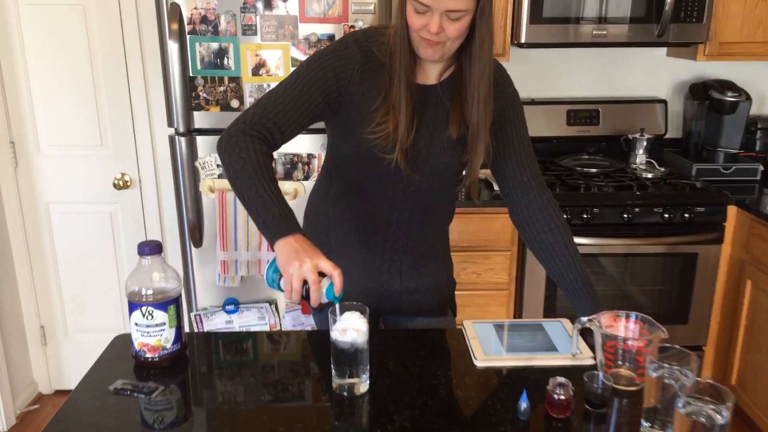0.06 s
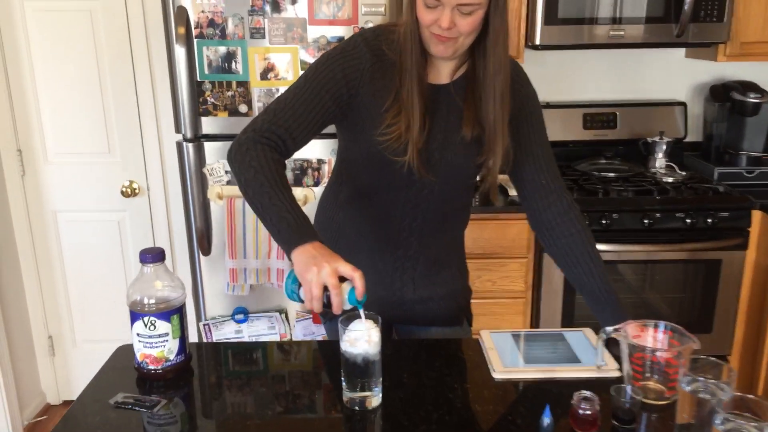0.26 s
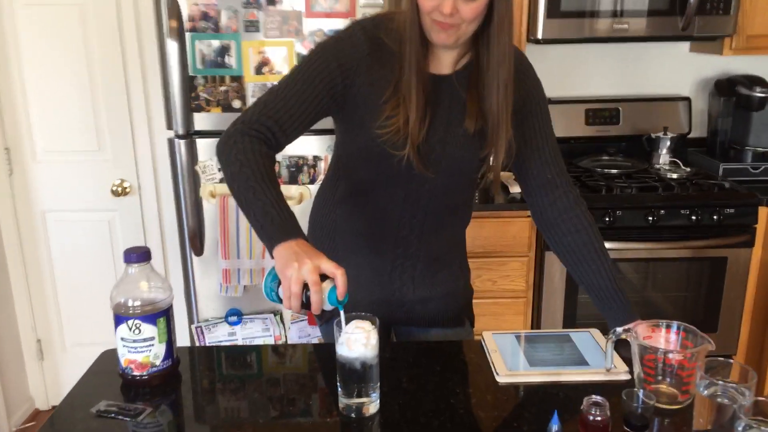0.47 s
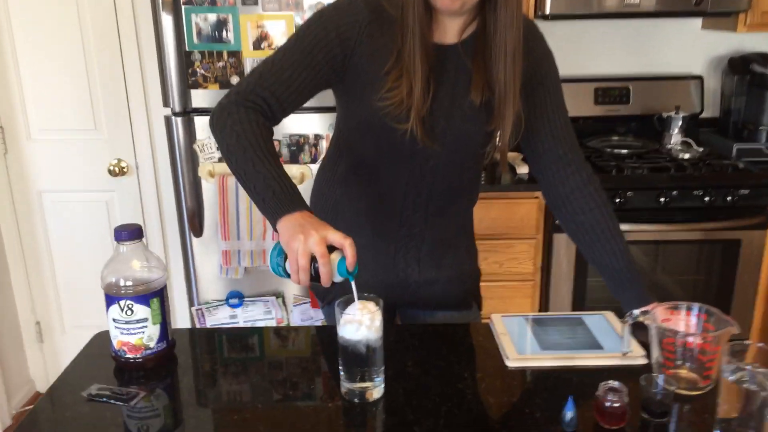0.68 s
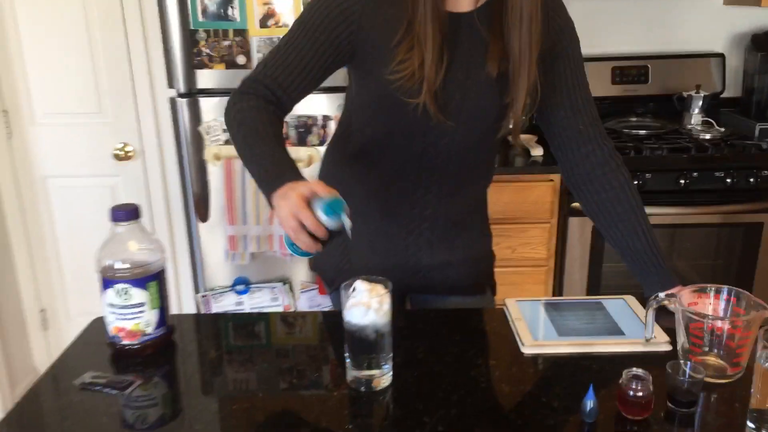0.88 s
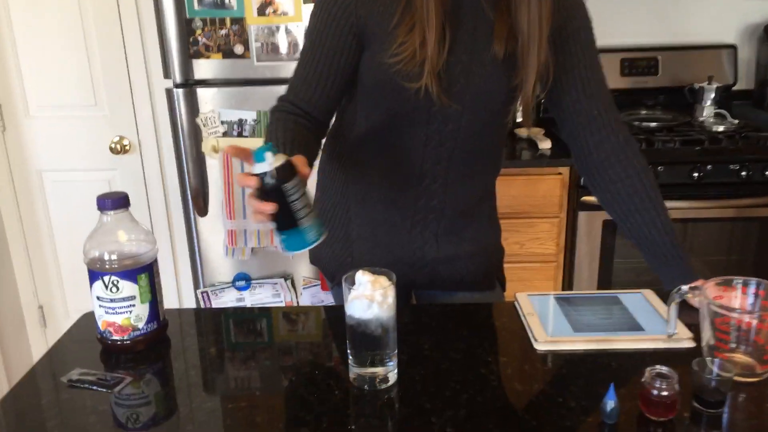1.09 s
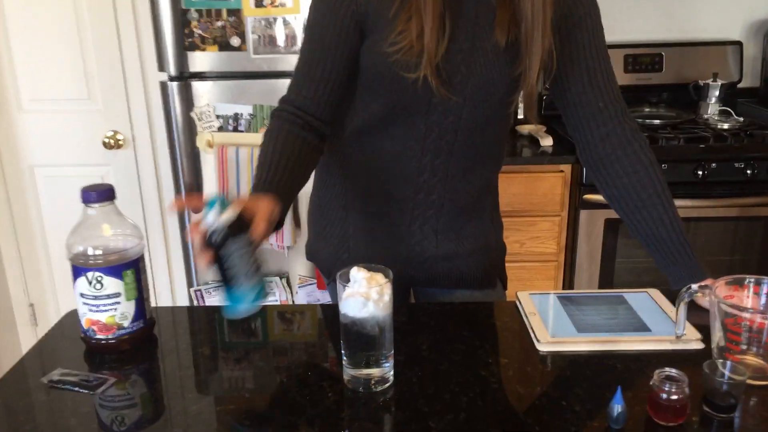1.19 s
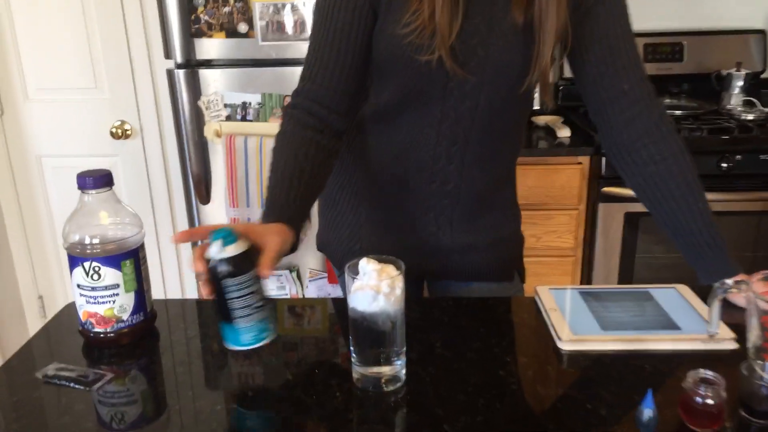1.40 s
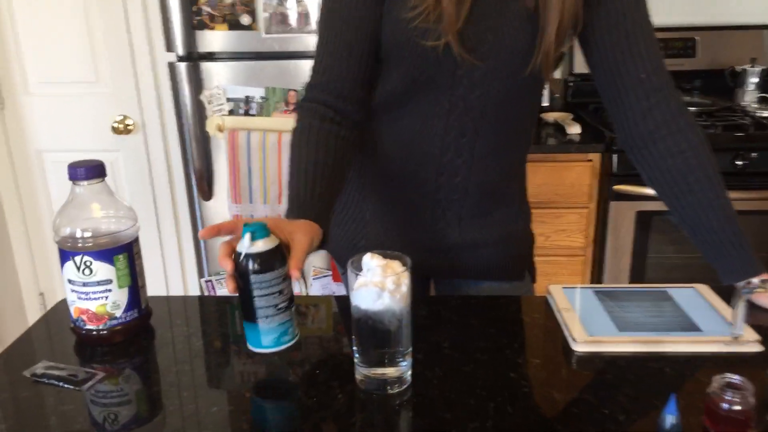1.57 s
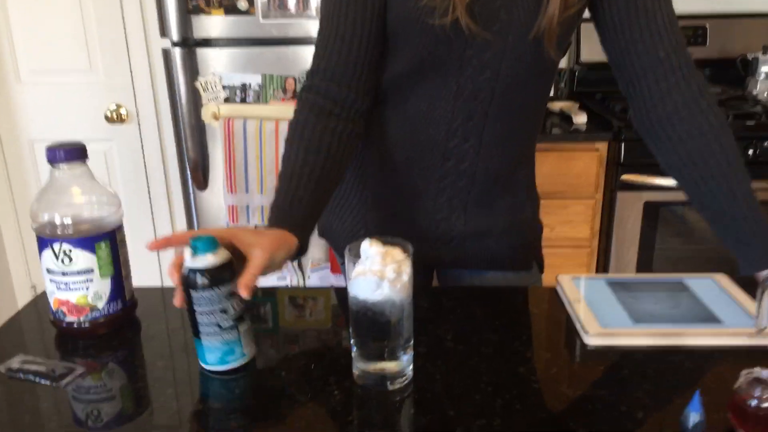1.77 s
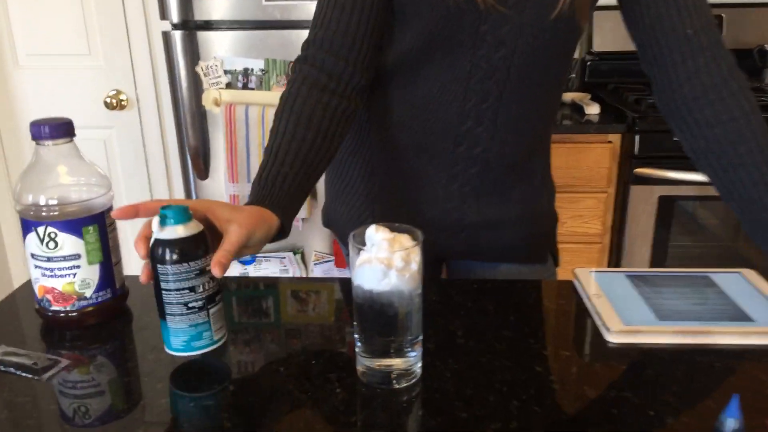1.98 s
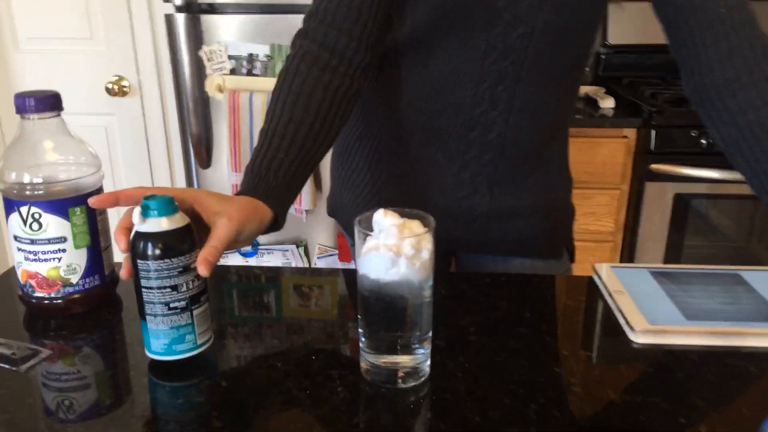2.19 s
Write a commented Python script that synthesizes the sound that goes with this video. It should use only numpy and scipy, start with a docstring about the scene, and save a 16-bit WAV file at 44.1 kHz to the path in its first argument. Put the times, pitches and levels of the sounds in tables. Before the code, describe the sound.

A spray can sputters foam into a glass and is set down with a ringing clack.

```python
"""A small kitchen: aerosol foam hisses and sputters into a glass as tiny bubbles burst, then stops.
A brighter spit of gas escapes with it early on.
The can is set down on a stone counter; its rim clacks and its shell rings through the room.
The hand-held camera adds low rumble, soft bumps and a few dry clicks of its case.
Faint room hiss lies underneath, with a high fizz in the second half."""
import sys
import numpy as np
from scipy import signal
from scipy.fft import rfft, irfft, next_fast_len
from scipy.io import wavfile
from scipy.ndimage import uniform_filter1d, map_coordinates

SR = 44100
rng = np.random.default_rng(int(sys.argv[2]) if len(sys.argv) > 2 else 0)


def file_out(sig):
    """Save sig as 16-bit WAV at sys.argv[1]."""
    # one column per channel
    cols = np.atleast_2d(sig).T
    # limit, then scale
    lim = np.clip(cols, -1, 1)
    pcm = np.round(lim * 32767).astype(np.int16)
    wavfile.write(sys.argv[1], SR, pcm)


N = 99225
TOP_HZ = 15850
# camera case modes: pitch_hz, level_db, t60_s
CASE_MODES = [(337, -17.5, 0.03), (558, 2, 0.024), (914, -1.5, 0.0076), (2180, -16, 0.0097)]


def amp(db):
    return 10 ** (np.asarray(db) / 20)


def unit(x):
    """Scale to rms 1."""
    return x / np.sqrt(np.mean(x ** 2) + 1e-20)


def along(points, hz):
    """Interpolate (freq_hz, value) rows on a log axis."""
    freq_hz, values = np.transpose(points)
    return np.interp(np.log(hz + 1), np.log(freq_hz + 1), values)


def curve(rows):
    """One value per sample from (time_s, value) rows."""
    return np.interp(np.arange(N) / SR, *np.transpose(rows))


def wobble(knots_per_s):
    """Smooth random curve."""
    return map_coordinates(rng.standard_normal(N // 20), [np.arange(N) * knots_per_s / SR])


def fade(t, t60_s):
    return np.exp(-np.log(1000) * t / t60_s)


def attack(t, rise_s):
    return 1 - np.exp(-t / rise_s)


def colour(x, spectrum):
    """Minimum-phase filter of unit power gain, shaped by (freq_hz, gain_db) rows."""
    size = 8192
    gain = amp(along(spectrum, np.fft.rfftfreq(size, 1 / SR)))
    cepstrum = irfft(np.log(unit(gain)))
    cepstrum[1:size // 2] *= 2
    cepstrum[size // 2 + 1:] = 0
    return signal.fftconvolve(x, irfft(np.exp(rfft(cepstrum))))[:len(x)]


def noise(spectrum):
    """Coloured noise of rms 1."""
    return unit(colour(rng.standard_normal(N + SR), spectrum)[SR:])


def add(track, start_s, sound):
    part = track[round(start_s * SR):][:len(sound)]
    part += sound[:len(part)]


def ring(modes, t, scatter_db):
    """Damped modes, each struck a little differently."""
    return sum(amp(db + scatter_db * rng.standard_normal()) * fade(t, t60_s) * np.sin(2 * np.pi * hz * t)
               for hz, db, t60_s in modes)


def room_hiss():
    """Steady hiss of the quiet room."""
    # hiss spectrum: freq_hz, gain_db
    spectrum = [(100, 21), (550, 20), (900, 6), (2000, 1), (4500, -8), (6400, -3), (7700, -10), (9200, -7),
                (9900, 3), (10500, -19), (13000, -3), (15700, -6)]
    return amp(-59) * noise(spectrum)


def handling_rumble():
    """Low handling rumble, with a low thump as the can lands at 1.9 s."""
    # rumble envelope: time_s, level_db
    envelope = [(0.0, -49.5), (0.07, -45), (0.26, -38), (0.35, -58.5), (0.38, -37), (0.48, -54),
                (0.53, -40), (0.6, -45), (0.63, -46), (0.71, -56), (0.75, -46), (0.82, -67), (0.85, -42),
                (0.94, -51.5), (0.97, -41), (1.23, -53), (1.28, -40.5), (1.3, -53), (1.5, -41),
                (1.53, -56.5), (1.55, -45), (1.81, -46), (1.87, -61), (1.9, -34), (1.95, -49.5),
                (2.0, -41.5), (2.04, -48), (2.25, -45)]
    # rumble spectrum: freq_hz, gain_db
    spectrum = [(18, -59), (35, -18.5), (55, -1.5), (80, 3.5), (130, -8.5), (200, -7.5), (300, -15.5),
                (420, -23.5), (600, -25), (900, -41), (2000, -51.5)]
    return amp(curve(envelope) - 0.5) * noise(spectrum)


def hand_bumps():
    """The hand bumps the camera: a rub and a knock of the case over a low thud."""
    # bumps: start_s, knock_db, thud_db
    bumps = [(.065, -59, -26.5), (0.106, -53, -24), (.38, -54, -26), (0.5, -39.5, -26), (.527, -39, -29),
             (.572, -26, -49), (0.851, -37.5, -37), (.967, -50, -27), (1.037, -42, -29.5),
             (1.065, -36, -46), (1.101, -39.5, -31.5), (1.144, -40.5, -30), (1.268, -39, -31),
             (1.352, -47, -33), (1.374, -40.5, -31.5), (1.485, -48.5, -35), (1.611, -49, -39),
             (1.721, -44.5, -35), (1.766, -42.5, -40), (1.79, -52, -30), (1.84, -47, -36),
             (1.995, -48, -33), (2.075, -47, -32), (2.171, -41, -27), (2.22, -64, -29.5)]
    # rub spectrum: freq_hz, gain_db
    rub_spectrum = [(30, -23), (90, 16), (250, -6), (420, -13), (590, 9.5), (760, -13), (1200, -30),
                    (3000, -43)]
    # modes of the camera in the hand: pitch_hz, level_db, t60_s
    thud_modes = [(75.8, -4, .09), (134.4, 1.5, 0.046), (213.4, 2, 0.017)]
    out, t = np.zeros(N), np.arange(SR // 10) / SR
    for start_s, knock_db, thud_db in bumps:
        rub = unit(colour(rng.standard_normal(len(t)), rub_spectrum)) * fade(t, t60_s=0.031)
        knock = amp(4) * rub + ring(CASE_MODES, t, scatter_db=-0.7)
        thud = ring(thud_modes, t, scatter_db=2.0) / 2
        add(out, start_s, (amp(knock_db) * knock + amp(thud_db) * thud) * attack(t, rise_s=0.0011))
    return out


def sputter(spectrum, flutter_db):
    """Tiny bubbles burst on a turbulent hiss, fluttering as foam and gas alternate."""
    pops_per_s, spread_db, pop_share = 1500, 4.5, 0.65
    pops = (rng.random(N) < pops_per_s / SR) * rng.choice([-1, 1], N)
    pops = pops * amp(spread_db * rng.standard_normal(N))
    source = np.sqrt(pop_share) * unit(pops) + np.sqrt(1 - pop_share) * rng.standard_normal(N)
    flutter = amp(flutter_db * (wobble(44.72) + wobble(220)))
    return unit(colour(source * flutter, spectrum))


def patchy(x, depth_db=2.6):
    """Brief resonances come and go as foam shifts in the nozzle and the glass."""
    bins = signal.stft(x, nperseg=512)[2]
    patches = uniform_filter1d(rng.standard_normal(bins.shape), size=5, axis=0)
    patches = uniform_filter1d(patches, size=7, axis=1)
    return unit(signal.istft(bins * amp(depth_db * unit(patches)), nperseg=512)[1][:N])


def bubbles():
    """Larger bubbles burst at random, each with a brief ping."""
    bursts_per_s, spread_db = 260, 4
    centre_hz, spread_octaves, t60_cycles = 4580, 0.546, 40
    out, t = np.zeros(N), np.arange(SR // 20) / SR
    for pitch, size in rng.standard_normal((int(bursts_per_s * N / SR), 2)):
        hz = min(centre_hz * 2 ** (spread_octaves * pitch), TOP_HZ)
        ping = np.sin(2 * np.pi * hz * t) * fade(t, t60_cycles / hz)
        add(out, rng.uniform(0, N / SR), amp(spread_db * min(size, 2)) * ping)
    return unit(out)


def foam():
    """Foam leaves the nozzle, sputtering and bubbling."""
    # foam flow: time_s, level_db
    flow = [(0, -42), (.2, -42), (.209, -36.3), (.35, -35.3), (.44, -37), (.51, -39), (.58, -37.5),
            (.76, -37.5), (.865, -39.5), (.9, -52), (.94, -80)]
    # foam spectrum: freq_hz, gain_db
    spectrum = [(290, -59), (500, -14), (657, -6), (716, -9), (815, -9.5), (941, -11.5), (1060, -12.5),
                (1220, -3), (1310, -5), (1450, -2), (1800, -6), (2010, -1.5), (2570, -19.5), (3060, -11.5),
                (3530, -10), (3960, -1), (4310, -8.5), (6000, -10.5), (6830, -22.5), (8980, -13),
                (10500, -29.5), (14000, -30), (15500, -32)]
    froth = patchy(sputter(spectrum, flutter_db=1.78))
    return amp(curve(flow)) * unit(froth + amp(-8) * bubbles())


def gas_jet():
    """Gas escapes with the foam in a brighter jet, strongest at first."""
    # gas flow: time_s, level_db
    flow = [(0, -58), (.2, -58), (.212, -40), (.28, -39), (.335, -42), (.37, -54), (.56, -58), (.68, -52),
            (.87, -55), (.92, -85)]
    # jet spectrum: freq_hz, gain_db
    spectrum = [(800, -56), (1400, -16), (2900, 4.5), (4500, -7.5), (7000, -41), (9500, -2.5), (10800, -6),
                (12200, 4), (13300, -1), (14300, 4), (15700, -34)]
    return amp(curve(flow)) * patchy(sputter(spectrum, flutter_db=5.0))


def case_clicks():
    """Dry case clicks, each made of two tight impulses, then a short ring."""
    # clicks: start_s, click_db, ring_db
    clicks = [(0.5773, -11, -38), (.6098, -0.5, -24.5), (0.6235, 1, -8.5), (1.4774, -3, -61)]
    # click spectrum: freq_hz, gain_db
    spectrum = [(150, -17), (700, 6), (1600, 2.5), (2700, 1.5), (5000, -8), (8000, -9), (11000, -9),
                (14000, -10), (16000, -5)]
    second_impulse_lag_s, ring_lag_s = 0.0003, 0.0007
    grit_db, second_impulse_db = -16, -11.5
    out, t = np.zeros(N), np.arange(SR // 10) / SR
    for start_s, click_db, ring_db in clicks:
        snap = (t == 0) + amp(grit_db) * rng.standard_normal(len(t)) * fade(t, t60_s=0.002)
        click = amp(click_db) * colour(snap, spectrum) / 2
        add(out, start_s, click)
        add(out, start_s + second_impulse_lag_s, -amp(second_impulse_db) * click)
        add(out, start_s + ring_lag_s, amp(ring_db) * ring(CASE_MODES, t, scatter_db=4.5))
    return out


def fizz():
    """A faint, high crackle flickers, swelling after the spray stops."""
    # fizz envelope: time_s, level_db
    envelope = [(0, -78), (1.03, -76), (1.09, -68), (1.17, -71), (1.3, -64.5), (1.72, -65.5), (1.9, -68.5),
                (2.25, -86)]
    # fizz spectrum: freq_hz, gain_db
    spectrum = [(1000, -17), (8000, -16), (11000, -5), (13000, 0.5), (14200, -8), (15700, -14)]
    return amp(curve(envelope)) * patchy(sputter(spectrum, flutter_db=3.5))


def can_on_counter():
    """The can lands and rocks; each rim contact clacks and rings the metal shell."""
    # rim contacts: start_s, level_db
    contacts = [(1.8958, -14), (1.898, -23), (1.921, -26), (1.9345, -27)]
    # clack spectrum: freq_hz, gain_db
    spectrum = [(60, -45), (200, -49), (430, -13.5), (700, -1.5), (1000, -3), (1350, 6.5), (1550, -8),
                (2050, 4), (2600, -10.5), (3400, -14), (4500, -23.5), (6300, -35.5), (7800, -31),
                (11000, -39.5), (16000, -58)]
    # shell modes: pitch_hz, level_db, t60_s
    shell_modes = [(659, -3, 0.14), (721, -7.5, 0.17), (845, -19, 0.097), (1095, -7, 0.23),
                   (1198, -14.5, 0.23), (1332, -15, 0.1), (1776, -8, 0.094), (1875, -1.5, 0.067),
                   (1910, -7.5, 0.17), (2047, -26, 0.18), (2164, -25, 0.36), (2870, -21, .18),
                   (3360, -30, 0.25), (4290, -29, 0.17)]
    out, t = np.zeros(N), np.arange(SR // 2) / SR
    for start_s, level_db in contacts:
        clack = amp(1) * colour(rng.standard_normal(len(t)) * fade(t, t60_s=0.035), spectrum)
        shell = amp(-3.5) * ring(shell_modes, t, scatter_db=0.5)
        add(out, start_s, amp(level_db) * (clack + shell) * attack(t, rise_s=0.00052))
    return out


def kitchen(x, wet_db):
    """Direct sound plus the room's tail, longest in the midrange."""
    # room decay: freq_hz, t60_s
    decay = [(200, 0.13), (1000, 0.49), (2200, 0.44), (4000, 0.39), (8000, 0.21), (14000, 0.39)]
    hz, t, bins = signal.stft(rng.standard_normal(SR), SR, nperseg=256)
    tail = signal.istft(bins * fade(t, along(decay, hz)[:, None]), SR, nperseg=256)[1]
    tail *= attack(np.arange(len(tail)) / SR, rise_s=0.0031)
    reverb = signal.fftconvolve(x, tail / np.linalg.norm(tail))[:N]
    return (x + amp(wet_db) * reverb) / np.hypot(1, amp(wet_db))


def scene():
    """Mono mix; only the spray and the can excite the room."""
    froth, gas = foam(), gas_jet()
    spray = kitchen(froth, wet_db=-4) + kitchen(gas, wet_db=-8)
    can = kitchen(can_on_counter(), wet_db=-4)
    handling = handling_rumble() + hand_bumps() + case_clicks()
    return (spray + can + handling + fizz() + room_hiss())[None]


def record(dry):
    """The camera cuts deep bass and everything above TOP_HZ."""
    low_cut_hz, size = 47, next_fast_len(N + SR // 2)
    highpassed = signal.sosfilt(signal.butter(2, low_cut_hz, "highpass", fs=SR, output="sos"), dry)
    passband = np.fft.rfftfreq(size, 1 / SR) < TOP_HZ
    return irfft(rfft(highpassed, size) * passband, size)[:, :N]


dry = scene()
out = record(dry)
file_out(out)
```